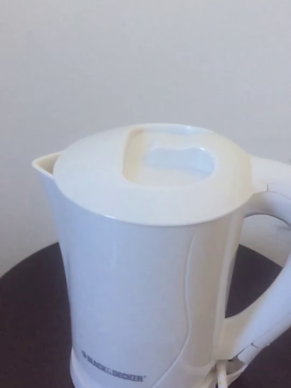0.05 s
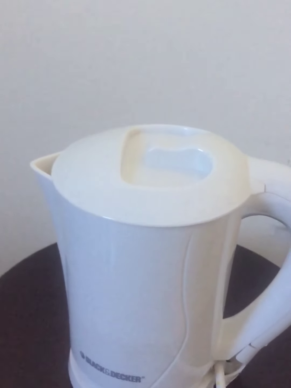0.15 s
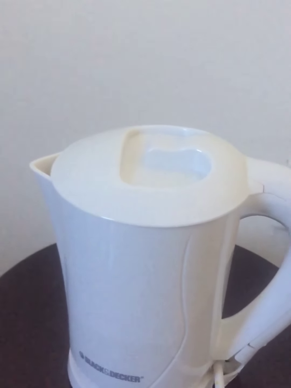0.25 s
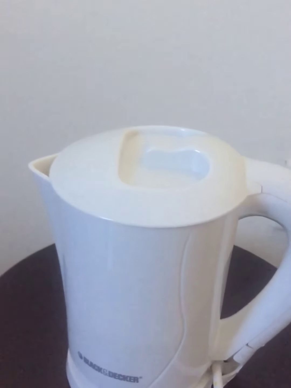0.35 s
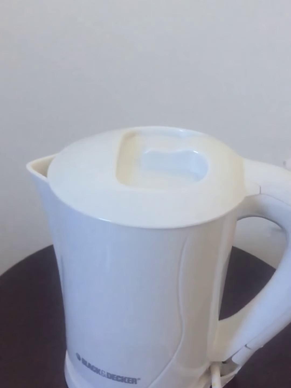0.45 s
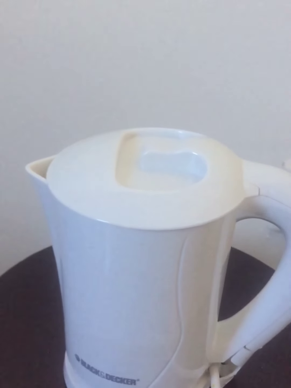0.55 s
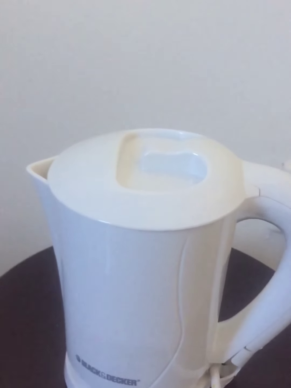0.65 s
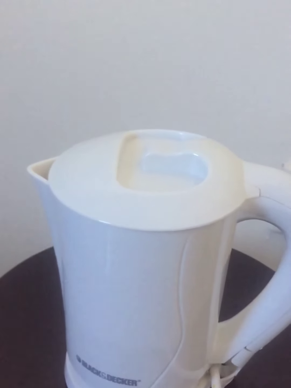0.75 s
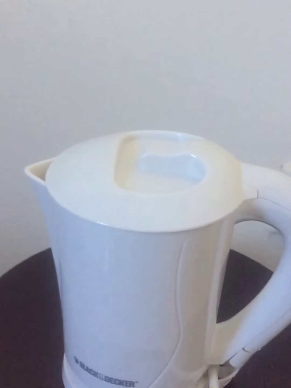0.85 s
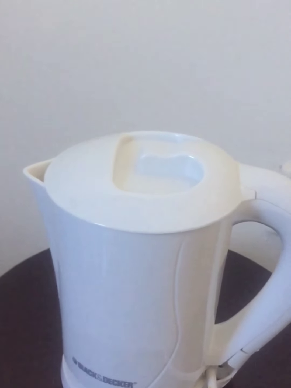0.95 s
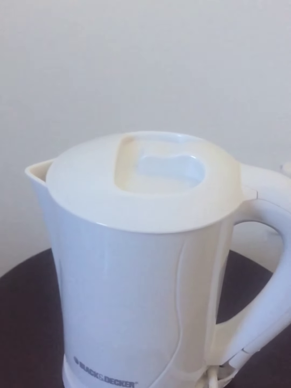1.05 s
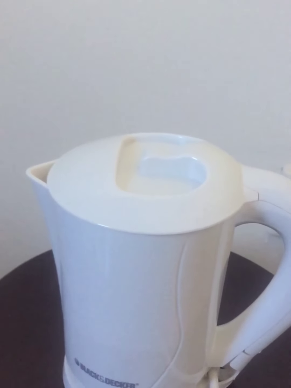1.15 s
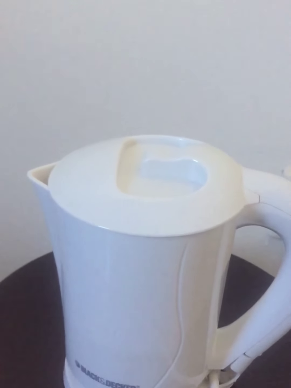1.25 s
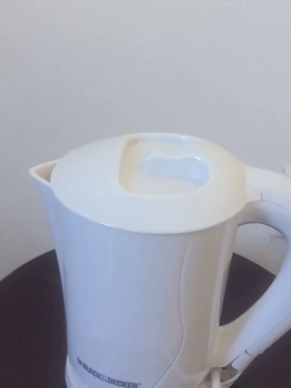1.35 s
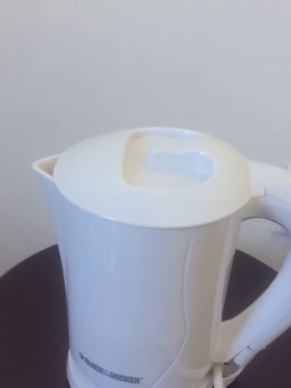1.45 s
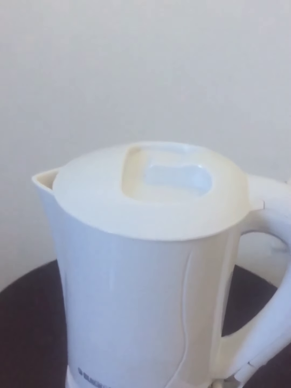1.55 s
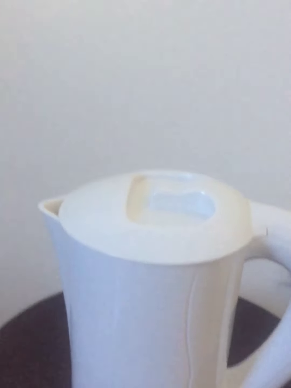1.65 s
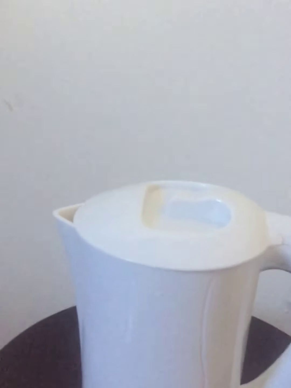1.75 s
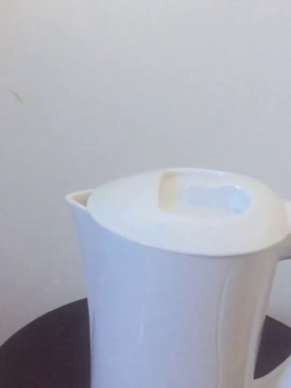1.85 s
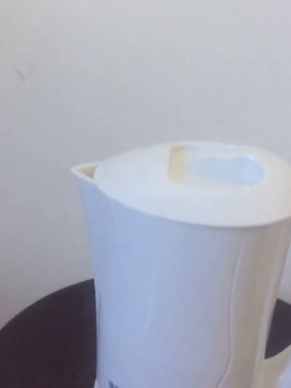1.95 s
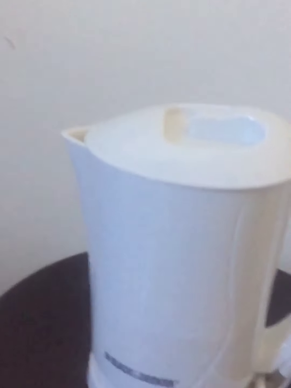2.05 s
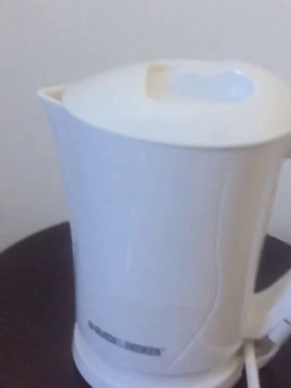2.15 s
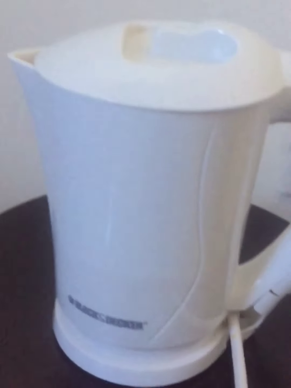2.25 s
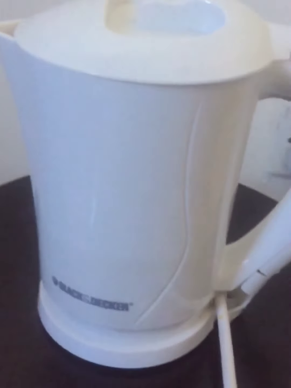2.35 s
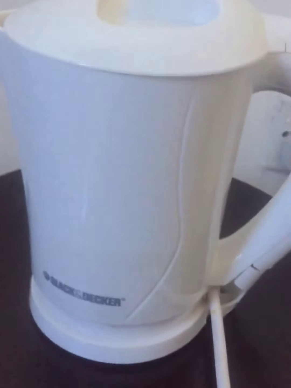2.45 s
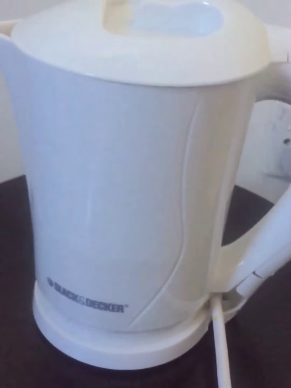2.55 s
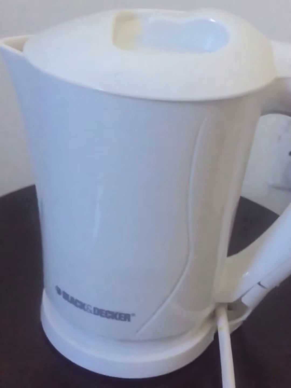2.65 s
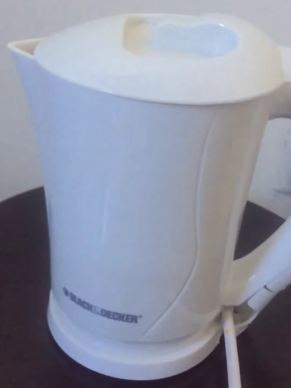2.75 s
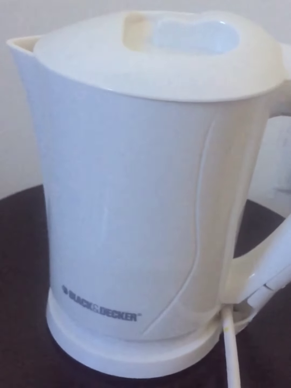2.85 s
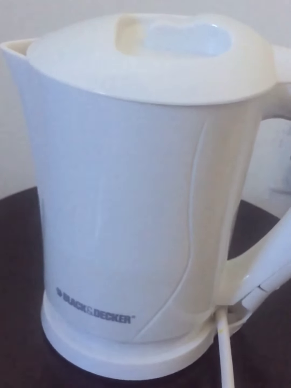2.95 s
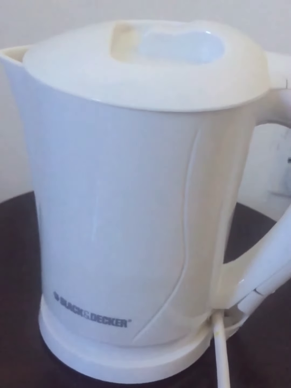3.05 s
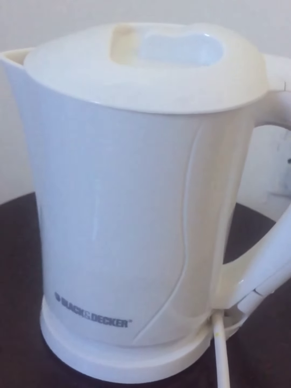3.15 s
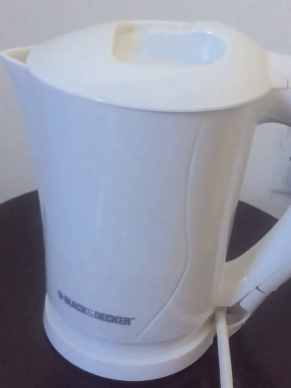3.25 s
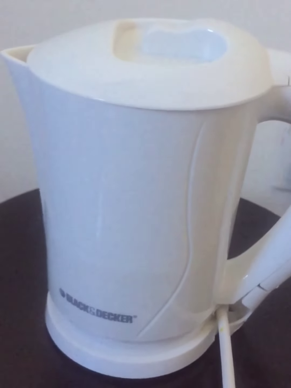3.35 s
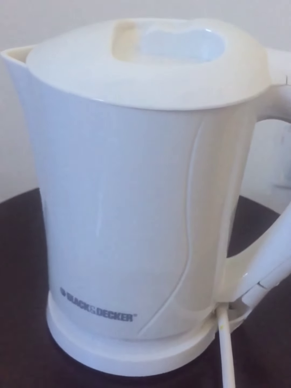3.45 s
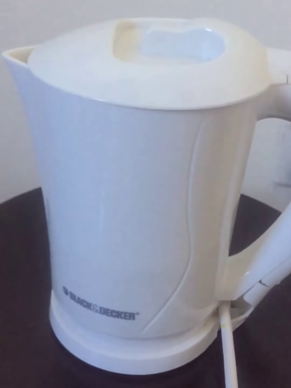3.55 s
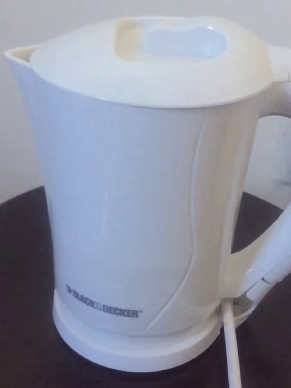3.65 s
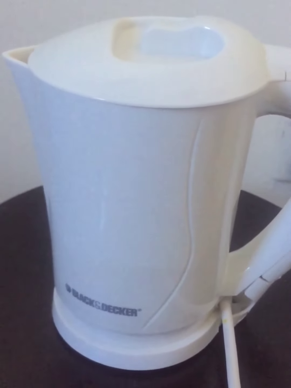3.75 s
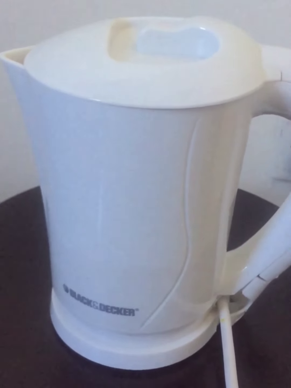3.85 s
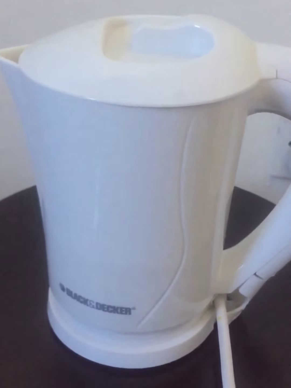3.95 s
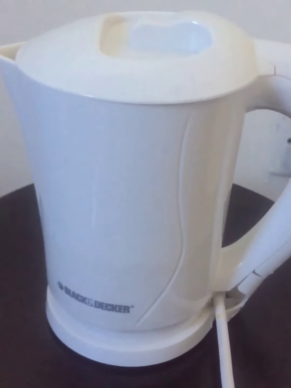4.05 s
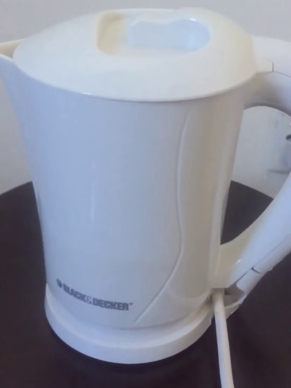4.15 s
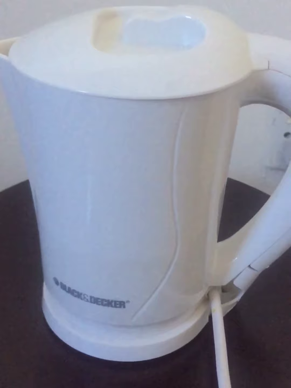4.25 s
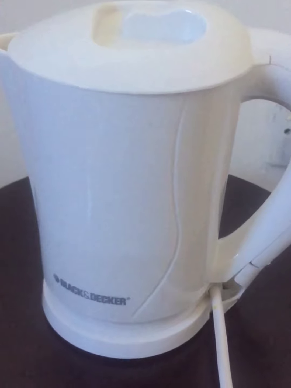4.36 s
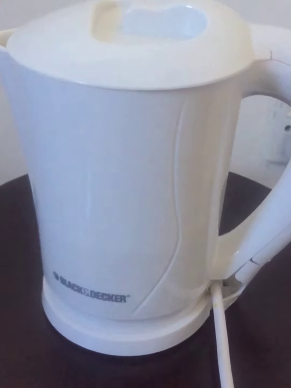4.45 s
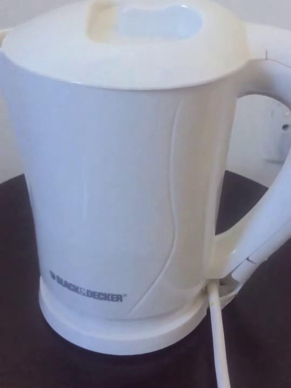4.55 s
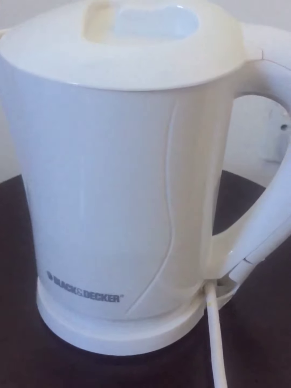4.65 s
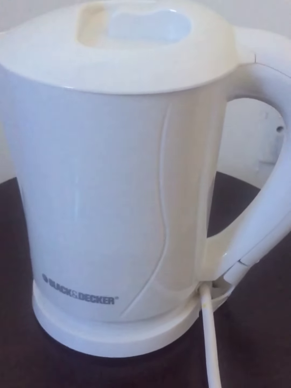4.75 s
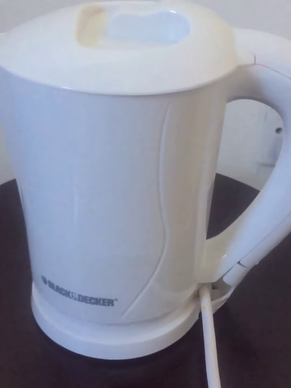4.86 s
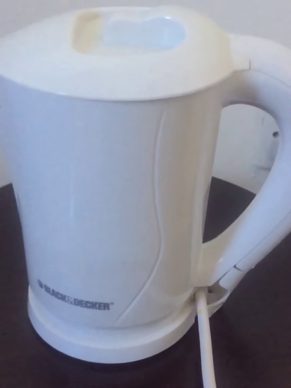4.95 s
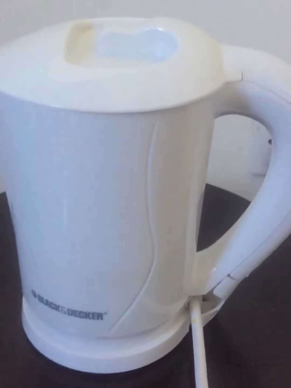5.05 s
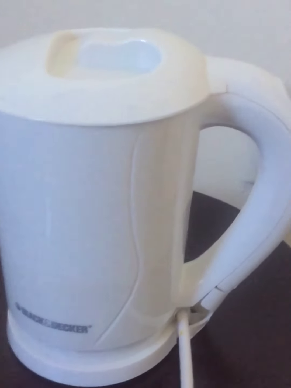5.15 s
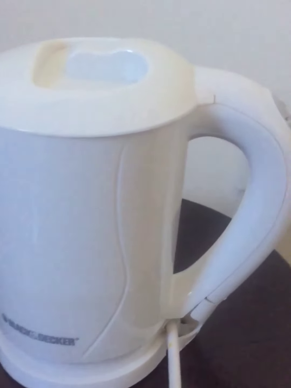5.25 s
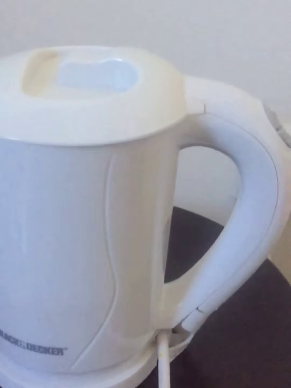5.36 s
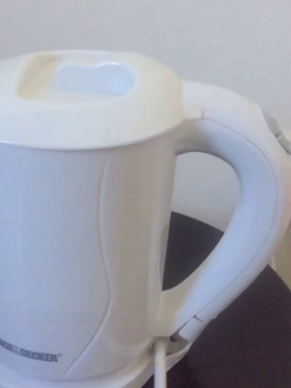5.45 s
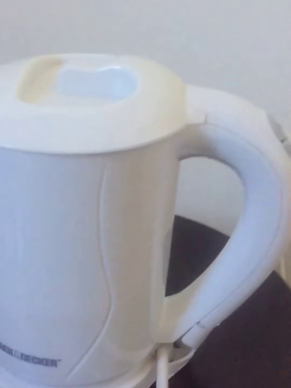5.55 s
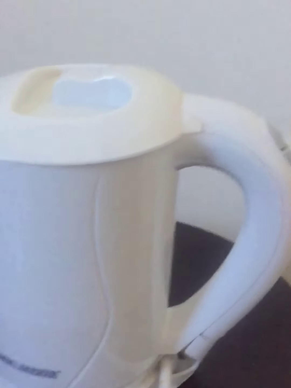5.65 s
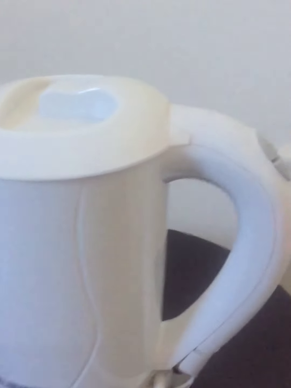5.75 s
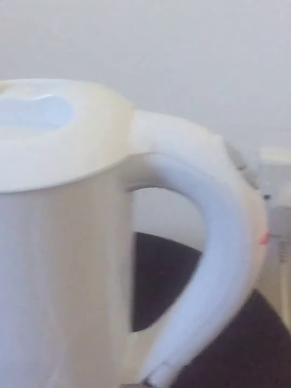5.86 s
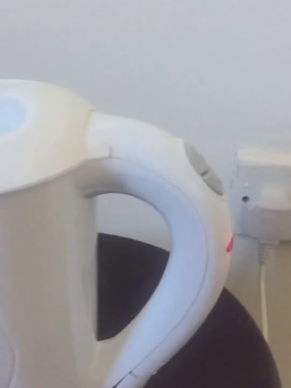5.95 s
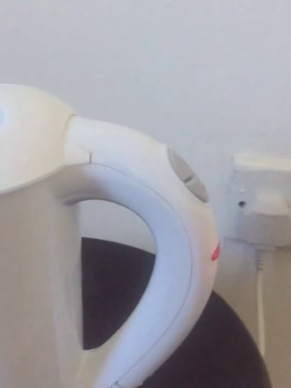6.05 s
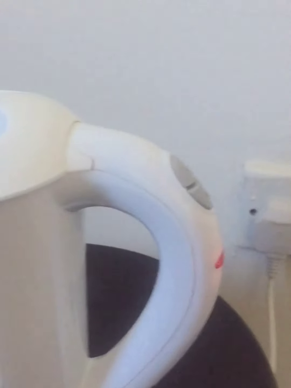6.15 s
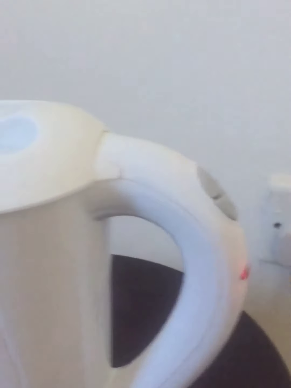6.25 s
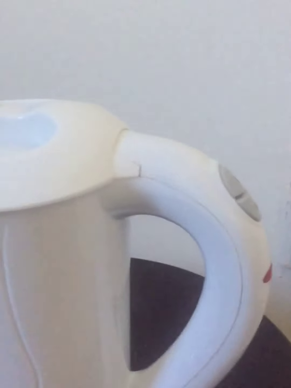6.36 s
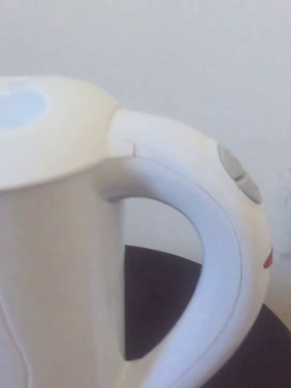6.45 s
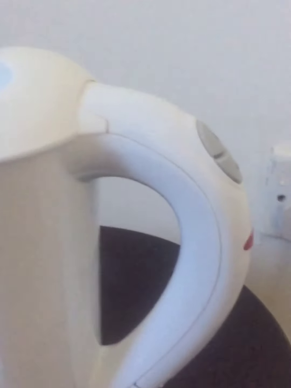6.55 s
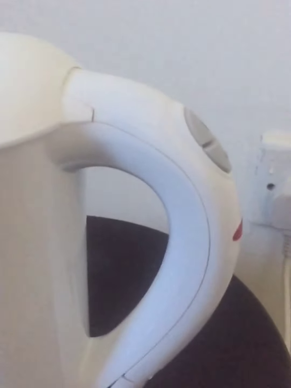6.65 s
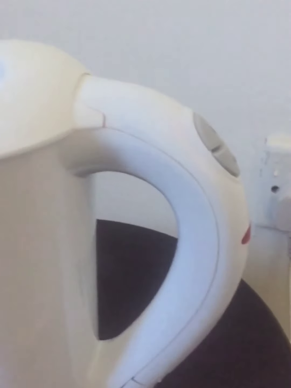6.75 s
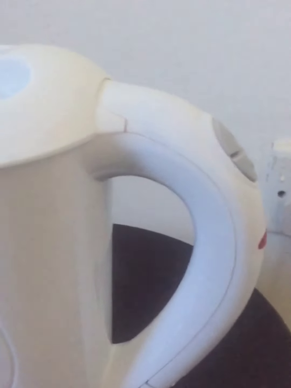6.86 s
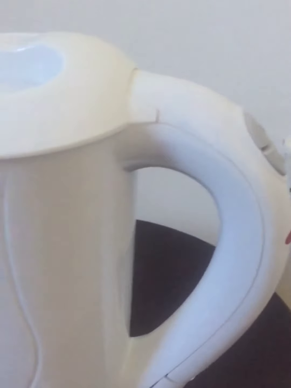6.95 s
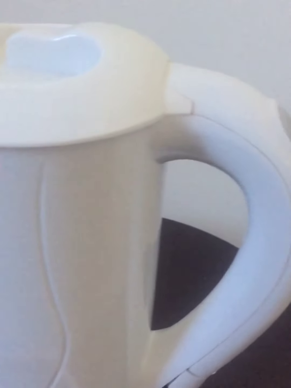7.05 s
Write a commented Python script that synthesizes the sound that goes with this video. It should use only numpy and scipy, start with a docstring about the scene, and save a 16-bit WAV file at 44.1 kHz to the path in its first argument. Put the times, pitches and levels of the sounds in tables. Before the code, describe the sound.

Continuous rapid bubbling rings inside a hollow plastic jug, close to the microphone in a small indoor space with short reflections. Small bubbles churn beneath larger rounded plops, and tiny drops spatter. Over a quiet wavering hum and slight hiss, a few thin ticks come late, followed by a single hard plastic switch snap, far louder than the water, which keeps boiling to the end.

```python
"""Water at a rolling boil in a plastic electric kettle, with one microphone close by in a small room. Big steam
bubbles are two-mode swings ringing the hollow jug; small bubbles and spray are clouds of tiny resonances, drops
are short noise bands. A few ticks sound as filtered noise bursts, most from the plastic, one a dry tap close
by; then the handle switch snaps off: ringing shell modes, a crack and chatter, while the water bubbles on.
Behind lie decaying room reflections, a faint motor hum of steady and fluttering tones, and coloured noise for
air and hiss."""
import sys
import numpy as np
from scipy import signal
from scipy.fft import rfft, irfft
from scipy.io import wavfile
from scipy.ndimage import uniform_filter1d

SR = 44100
rng = np.random.default_rng(int(sys.argv[2]) if len(sys.argv) > 2 else 0)


def master_out(mix):
    """Clip the mix to full scale and print it as 16-bit PCM to the path in sys.argv[1]."""
    frames = np.transpose(np.atleast_2d(mix))
    ceiling = np.clip(frames, -1, 1)
    pcm = np.round(ceiling * 32767).astype(np.int16)
    wavfile.write(sys.argv[1], SR, pcm)


N = 313551
TIME = np.arange(N) / SR
SHORT = TIME[:SR // 4]  # a quarter second for single events

# Big steam bubbles breaking the surface. Each row: start in seconds, peak level in dB, pitch in Hz,
# wetness in dB relative to the bubble (sets its burst and its surge of spray).
BIG_BUBBLES = [(0.01, -35, 397, -9), (0.184, -32.5, 346, -19), (0.273, -38, 464, -25),
               (0.358, -39.5, 656, -19), (0.389, -37.5, 606, -20), (0.408, -42, 410, -35),
               (0.444, -38.5, 442, -21), (0.557, -38, 428, -21), (0.572, -38.5, 580, -13),
               (0.596, -38, 426, -23), (0.634, -36, 426, -15.5), (0.655, -39, 370, -19),
               (0.741, -40, 590, -14), (0.761, -39.5, 430, -29), (0.804, -40.5, 575, -35),
               (0.854, -39, 580, -25), (0.88, -36, 454, -18), (0.912, -36, 358, -16.5),
               (1.007, -42, 440, -14), (1.031, -40.0, 420, -23), (1.221, -32, 450, -22),
               (1.409, -41, 410, -17), (1.432, -36.5, 480, -20), (1.52, -40.0, 334, -28),
               (1.553, -36.5, 334, -22), (1.579, -37.5, 440, -18), (1.639, -41, 447, -32),
               (1.655, -36, 360, -29), (1.709, -39, 430, -24), (1.828, -40, 510, -36),
               (1.975, -37.5, 615, -17), (2.029, -38, 290, -13), (2.168, -35.5, 425, -27),
               (2.238, -36, 446, -28), (2.253, -36.5, 453, -32), (2.29, -37, 380, -15),
               (2.315, -34.5, 304, -27), (2.341, -42, 474, -20), (2.362, -35, 420, -20),
               (2.445, -39.5, 483, -18), (2.526, -37, 436, -19), (2.592, -41, 400, -20),
               (2.614, -36.5, 564, -16), (2.631, -39.5, 318, -16), (2.651, -36.5, 308, -18),
               (2.676, -35.5, 306, -17), (2.714, -39, 388, -25), (2.766, -38.5, 576, -30),
               (2.832, -37, 476, -16), (2.874, -37, 457, -22), (2.933, -37.5, 454, -19),
               (2.955, -34.5, 580, -21), (2.968, -34, 370, -33), (2.983, -45, 583, -30),
               (3.055, -32, 498, -29), (3.077, -41, 410, -28), (3.104, -36.5, 357, -38),
               (3.137, -37, 624, -23), (3.25, -35, 345, -19), (3.316, -38, 390, -31),
               (3.363, -38.5, 546, -13), (3.383, -43, 404, -33), (3.449, -35, 377, -27),
               (3.482, -34.5, 530, -30), (3.494, -36.5, 422, -36), (3.524, -39.5, 454, -22),
               (3.588, -40, 450, -31), (3.615, -34.5, 413, -27), (3.632, -41, 410, -17),
               (3.647, -39, 390, -25), (3.716, -35, 580, -28), (3.741, -34.5, 374, -40),
               (3.772, -38, 448, -24), (3.918, -32.5, 570, -24), (3.947, -37, 520, -17),
               (3.999, -39, 490, -22), (4.041, -36, 417, -17.5), (4.135, -40.5, 420, -16),
               (4.166, -38.0, 494, -30), (4.181, -41, 420, -29), (4.216, -35.5, 473, -24),
               (4.24, -38.5, 444, -16), (4.256, -36.0, 406, -36), (4.293, -35, 407, -36),
               (4.379, -36, 466, -33), (4.395, -43.5, 413, -27), (4.476, -34, 416, -18.5),
               (4.523, -36, 366, -28), (4.614, -39.5, 410, -19.5), (4.692, -40.0, 366, -16),
               (4.714, -37, 384, -20.5), (4.847, -38, 570, -15), (4.87, -39.5, 412, -20),
               (4.89, -37.5, 412, -24), (4.92, -39, 350, -27), (4.957, -38.5, 547, -33),
               (4.98, -35, 437, -12.5), (5.129, -36.0, 420, -15), (5.262, -39.5, 426, -27),
               (5.382, -38.5, 380, -18), (5.413, -33.5, 330, -19.5), (5.432, -34, 317, -22),
               (5.46, -35, 520, -26), (5.598, -36.5, 340, -30), (5.647, -35.5, 464, -28),
               (5.661, -32, 493, -26), (5.681, -37.5, 570, -21), (5.723, -35.5, 376, -21),
               (5.789, -37, 487, -11.5), (5.829, -36, 420, -35), (5.86, -41.5, 390, -21),
               (5.95, -39, 615, -17.5), (5.98, -42.5, 465, -35), (6.027, -39, 428, -11),
               (6.044, -38.5, 410, -16), (6.096, -41.5, 460, -14), (6.114, -36, 500, -15.5),
               (6.249, -36.0, 485, -21), (6.394, -38, 400, -15), (6.549, -33.0, 447, -28),
               (6.581, -33.5, 400, -24), (6.625, -35.5, 350, -17.5), (6.644, -37.5, 443, -21),
               (6.68, -40.0, 397, -17), (6.704, -34, 468, -24), (6.722, -41, 630, -15),
               (6.842, -36.5, 420, -18), (6.861, -35, 414, -27), (6.914, -39, 534, -21),
               (6.994, -33, 436, -23), (7.027, -34, 450, -21)]
# Large pockets of steam deep in the jug. Each row: start in seconds, peak level in dB before a common lift,
# starting pitch in Hz.
DEEP_GULPS = [(0.129, -54, 147), (0.352, -47, 184), (0.9, -43, 175), (1.221, -37.5, 265), (2.027, -45, 253),
              (2.297, -46, 156), (2.4, -45.5, 150), (2.711, -45, 148), (4.708, -52, 188),
              (6.16, -48.5, 218), (6.679, -49, 204)]
# Resonances of the jug, its water and the air above. Each row: frequency in Hz,
# width in Hz (a twentieth of the frequency at least), gain in dB.
JUG_MODES = [(169.4, 18, -7), (231, 9.4, -10.5), (284.2, 28, -2), (327.7, 14, 2), (398.4, 54, -5),
             (440, 20, -15.5), (453, 320, -7.5), (538.5, 26, -4), (616, 52, -10.5), (767, 77, -11.5),
             (943, 114, -10.5)]
# Vigour of the boil, the reference for the water between big bubbles. Each row: time in seconds, level in dB.
BOIL_VIGOUR = [(0.0, -47.5), (0.53, -52.5), (0.9, -51), (1.2, -50.5), (1.9, -50.5), (2.35, -49),
               (2.8, -50.5), (3.05, -48.5), (3.3, -52), (3.62, -48.5), (3.85, -51), (4.18, -50),
               (4.67, -48), (5.31, -49), (5.7, -51), (6.0, -51.5), (6.36, -50), (6.66, -47), (7.11, -51)]
# Moments when the water rests. Each row: deepest point in seconds, half length in seconds.
BOIL_LULLS = [(0.075, 0.044), (0.321, 0.012), (0.793, 0.028), (1.053, 0.015), (1.294, 0.017),
              (1.475, 0.0065), (1.911, 0.0043), (2.206, 0.012), (2.911, 0.0077), (3.677, 0.017),
              (4.641, 0.047), (4.806, 0.014), (5.018, 0.018), (5.546, 0.029), (6.517, 0.025),
              (6.773, 0.058)]
# Colour of spray coming out through the spout. Each row: frequency in Hz, relative level in dB per Hz.
SPOUT_COLOUR = [(650, -24), (1100, -17.5), (1190, -0.5), (1410, -1), (1650, -11.5), (1810, -7.5),
                (2240, -5), (2640, -13), (3060, -7.5), (3860, -16), (4900, -17), (5300, -12.5), (7000, -13),
                (9100, -66), (15400, -120)]
# Drops thrown against the wall. Each row: start in seconds, peak level in dB, pitch in Hz.
WALL_DROPS = [(0.182, -56.5, 4430), (0.184, -54, 2550), (0.21, -54.5, 1430), (0.358, -56.0, 2880),
              (0.574, -55, 2430), (0.595, -51.5, 2160), (0.635, -59, 1940), (0.652, -53, 2190),
              (0.743, -61, 4400), (0.886, -54.5, 1480), (0.919, -67, 9000), (1.101, -54, 2200),
              (1.227, -56, 1870), (1.328, -53, 1560), (1.579, -53, 1660), (1.794, -59, 4000),
              (1.971, -62, 5400), (1.979, -52, 3100), (2.018, -55, 2090), (2.091, -54.5, 2700),
              (2.253, -57, 1500), (2.287, -56, 2400), (2.322, -60, 4600), (2.374, -55.5, 2300),
              (2.606, -50, 2200), (2.637, -54.5, 1800), (2.652, -58, 2620), (2.703, -53.5, 1960),
              (2.847, -49, 1720), (2.954, -59.5, 2370), (3.055, -56, 2150), (3.173, -59, 5000),
              (3.176, -47, 1700), (3.363, -47.5, 2270), (3.458, -54.5, 2300), (3.491, -57, 1650),
              (3.619, -53, 1780), (3.644, -54, 1930), (3.78, -56.5, 1640), (3.887, -55, 2080),
              (4.04, -58, 2220), (4.145, -50, 3070), (4.244, -48.5, 2030), (4.467, -60, 1650),
              (4.697, -61, 5950), (4.698, -58, 2200), (4.846, -53.5, 2560), (4.983, -50, 5600),
              (4.984, -48, 2800), (5.08, -54, 1600), (5.115, -56, 2200), (5.192, -52, 2200),
              (5.308, -59, 1500), (5.338, -50, 2300), (5.592, -51.5, 2050), (5.68, -54.0, 2400),
              (6.029, -55, 2220), (6.042, -56, 2070), (6.117, -60, 2150), (6.335, -56, 2730),
              (6.608, -53.5, 2360), (6.722, -59, 1900), (6.815, -52.5, 2840), (6.854, -56, 2050),
              (6.918, -57.5, 4650), (7.02, -50, 2010)]
# Ticks, most of them from the plastic, one (at 5.13 s) a dry tap close by. Each row: start in seconds, peak
# level in dB, decay t60 in seconds, lowest frequency in Hz, feed to the room in dB relative to the tick.
TICKS = [(4.521, -60, 0.079, 3980, -4), (4.862, -66, .05, 7000, -8), (5.1322, -47, 0.01, 6000, -20),
         (5.655, -54, 0.064, 4000, -8), (5.734, -60, .03, 4500, 2), (5.778, -51, .015, 4000, -13),
         (5.781, -42, 0.039, 3600, -6), (6.103, -63, 0.06, 5000, 2), (6.137, -65, 0.12, 5000, -2),
         (6.566, -47, 0.069, 4060, -6), (6.817, -56, 0.096, 2980, -7)]
# Bright crack of plastic on plastic. Each row: frequency in Hz, relative level in dB per Hz.
CRACK_COLOUR = [(2500, 17.5), (4500, -5), (6500, 1), (9000, 1), (10500, -2.5), (12800, -4), (14500, -1),
                (16000, -13.5)]
# The switch lets go, hits its stop and bounces. Each row: time in seconds, strength in dB.
SNAP_CONTACTS = [(6.436, -30), (6.4366, -0.5), (6.439, -26)]
# Modes of the handle and shell. Each row: frequency in Hz, level in dB, decay t60 in seconds.
SHELL_MODES = [(830, -19.5, 0.012), (950, -40, 0.016), (1140, -20.5, 0.019), (1594, -14, 0.016),
               (1760, -17, 0.018), (2040, -14, 0.011), (2490, -37, 0.0095), (3070, -18, 0.012),
               (3690, -29.5, 0.0092), (4260, -27, 0.013), (5500, -29, 0.0079), (6240, -33, 0.0088),
               (7660, -28.5, 0.017), (9040, -31, 0.016)]
# Where the shell's modes cancel: frequency in Hz, width in Hz.
SHELL_NULL = (1300, 80)
# Loose parts and the spring after the snap. Each row: frequency in Hz, width in Hz of each of two
# resonator passes, peak level in dB, decay t60 in seconds.
LOOSE_PARTS = [(1590, 450, -34, 0.31), (2080, 320, -39, 0.15), (3160, 530, -43, 0.18),
               (4180, 440, -40.5, 0.16), (7400, 6000, -48, 0.16), (12900, 900, -48, 0.12)]
# Returns of the snap from nearby walls. Each row: delay in seconds, level in dB.
WALL_ECHOES = [(0.0215, -23), (0.046, -26)]
# Decay of the room. Each row: frequency in Hz, t60 in seconds.
ROOM_DECAY = [(200, 0.077), (1500, 0.18), (4000, 0.26), (12000, 0.17)]
# Colour of the reflections. Each row: frequency in Hz, relative level in dB.
WALL_COLOUR = [(300, 5.5), (1500, -2), (4200, -4.5), (5500, -7.5), (10500, -2.5), (13000, 0.5), (15000, -7)]
# Low harmonics of the motor. Each row: frequency in Hz, rms level in dB, fluttering share of the power 0-1.
HUM_HARMONICS = [(48.8, -63, 0.5), (97, -65, 1), (146.7, -64.5, 0.67)]
# Swelling and fading of the hum's clearest line. Each row: time in seconds, rms level in dB.
HUM_LINE_SWELL = [(0.1, -76), (0.58, -52), (0.87, -67), (1.05, -56.5), (1.55, -59.5), (1.75, -72),
                  (2.1, -56), (2.42, -56), (2.7, -69), (3.25, -57.5), (3.62, -55.5), (4.1, -65.5),
                  (5.05, -56.5), (5.33, -68), (5.62, -54.5), (5.92, -55.5), (6.15, -63), (6.95, -55.5)]
# Still air of the room and microphone hiss. Each row: frequency in Hz, relative level in dB per Hz.
AIR_COLOUR = [(25, -27), (35, -31), (43, 6), (52, 5.5), (62, -1.5), (75, -2), (115, -9), (170, -4),
              (500, -29.5), (1200, -32.5), (3000, -34), (4900, -38.5), (6200, -38.5), (9000, -41.5),
              (10400, -44), (12000, -45), (16000, -48)]
# Narrow dips in the microphone's response. Each row: frequency in Hz, width in Hz, depth 0-1.
MICROPHONE_DIPS = [(4900, 300, 0.3), (7580, 1300, 0.29), (10460, 420, 0.6)]

# Each big bubble comes with a surge of small ones, which swells quickly and settles.
SURGE_LEAD_S, SURGE_ATTACK_S, SURGE_HOLD_S = 0.0024, 0.0023, 0.0087
CHURN_SETTLES_T60_S, SPRAY_SETTLES_T60_S = 0.041, 0.063
CHURN_SURGE_DB, SPRAY_SURGE_DB = -15, -12  # relative to the bubble, and to bubble plus wetness
CHURN_BASE_DB, SPRAY_BASE_DB = -2.5, -22  # between surges, relative to the vigour
GUSHES_PER_S, GUSH_DB = 24, 2  # chance swells of the small bubbles
LULL_DB = -7.5
HUM_LINE_HZ = 193.3
AIR_DB = -58.5  # rms
CUTOFF_HZ = 15750


def from_db(db):
    """Decibels to gain."""
    return 10 ** (np.asarray(db) / 20)


def rms_one(x):
    """Scale to unit rms."""
    return x / np.sqrt(np.mean(x ** 2) + 1e-20)


def peak_one(x):
    """Scale to unit peak."""
    return x / np.max(np.abs(x))


def at_hz(points, hz):
    """Read a curve on a log-frequency axis."""
    table_hz, values = np.transpose(points)
    return np.interp(np.log(hz + 1e-9), np.log(table_hz), values)


def coloured(x, spectrum):
    """Shape a sound with a spectrum in dB."""
    hz = np.fft.rfftfreq(len(x), 1 / SR)
    return irfft(rfft(x) * from_db(at_hz(spectrum, hz)), len(x))


def drift(swells_per_s):
    """Random wander of unit rms, with two knots per swell."""
    knots = rng.standard_normal(4096)
    return rms_one(np.interp(TIME * swells_per_s * 2, np.arange(len(knots)), knots))


def grit(grain_per_s, grain_db):
    """Uneven gain for a short event, wandering between random levels."""
    levels = rng.standard_normal(512)
    return from_db(grain_db * np.interp(SHORT * grain_per_s, np.arange(512), levels))


def passed(x, hz, kind, order=2):
    """Butterworth filter."""
    return signal.sosfilt(signal.butter(order, hz, kind, fs=SR, output="sos"), x + 1e-18)


def resonate(x, hz, width_hz):
    """One resonance with gain 1 on top."""
    r = np.exp(-np.pi * width_hz / SR)
    feed = np.array([1, 0, -1]) * (1 - r * r) / 2
    feedback = [1, -2 * r * np.cos(2 * np.pi * hz / SR), r * r]
    return signal.lfilter(feed, feedback, x + 1e-18)


def dying(t60):
    """A quarter second of exponential decay."""
    return from_db(-60 * SHORT / t60)


def add(track, s, sound):
    """Mix a sound into a track at a time in seconds."""
    start = max(round(s * SR), 0)
    track[start:start + len(sound)] += sound[:N - start]


def grains(per_s, spread_db):
    """Random clicks of uneven size and either sign."""
    sizes = from_db(spread_db * np.minimum(rng.exponential(1, N), 3))
    signs = rng.choice([-1, 1], N)
    return sizes * signs * (rng.random(N) < per_s / SR)


def evened(x, seconds):
    """Hold the slow level at 1 and keep the fine grain."""
    power = uniform_filter1d(x ** 2, max(int(seconds * SR), 2))
    return x / np.sqrt(np.abs(power) + 1e-12)


def jug(x):
    """The hollow jug rings with whatever the water does; its lid holds back the treble."""
    rung = sum(from_db(db) * resonate(x, hz, max(width_hz, hz / 20)) for hz, width_hz, db in JUG_MODES)
    return passed(passed(rung, 950, "low", order=4), 120, "high")


def big_bubbles(swell_s=0.002, t60=0.016, slap=0.36, overtone=0.24, overtone_ratio=1.417,
                burst_t60=0.035, burst_db=-5, burst_top_hz=4200, burst_attack_s=0.00053, burst_delay_s=0.001038):
    """A large bubble swings in two modes, rising in pitch as it surfaces, slaps the water and bursts."""
    out = np.zeros(N)
    for s, db, hz, wet_db in BIG_BUBBLES:
        phase = 2 * np.pi * hz * SHORT * (1 + 5 * SHORT)  # the squared time raises the pitch
        swing = np.sin(phase) + overtone * np.sin(overtone_ratio * phase)
        swing += slap * rms_one(passed(rng.standard_normal(len(SHORT)), [500, 1200], "band"))
        swing *= np.minimum(SHORT / swell_s, 1) * dying(t60)
        add(out, s, from_db(db) * peak_one(jug(swing)))
        burst = coloured(rng.standard_normal(len(SHORT)), SPOUT_COLOUR)
        burst = passed(burst, burst_top_hz, "low") * dying(burst_t60)
        burst *= np.minimum(SHORT / burst_attack_s, 1)
        add(out, s + burst_delay_s, from_db(db + wet_db + burst_db) * peak_one(burst))
    return out


def gulps(swell_s=0.0051, t60=0.06, lift_db=2):
    """A deep pocket of steam swells into a rounded low note, rises slightly and dies away."""
    out = np.zeros(N)
    for s, db, hz in DEEP_GULPS:
        note = np.sin(2 * np.pi * hz * SHORT * (1 + 0.65 * SHORT))
        note *= np.minimum(SHORT / swell_s, 1) * dying(t60)
        add(out, s, from_db(db + lift_db) * peak_one(note))
    return out


def surge(t60):
    """Attack, hold and release of the water stirred by one big bubble."""
    settling_s = np.maximum(SHORT - SURGE_ATTACK_S - SURGE_HOLD_S, 0)
    return np.minimum(SHORT / SURGE_ATTACK_S, 1) * from_db(-60 * settling_s / t60)


def agitation():
    """Levels in dB of churn and spray: a restless boil with lulls, plus a surge for each big bubble."""
    resting = sum(np.exp(-((TIME - s) / half_s) ** 4) for s, half_s in BOIL_LULLS)
    boil_db = np.interp(TIME, *np.transpose(BOIL_VIGOUR))
    boil_db = boil_db + GUSH_DB * drift(GUSHES_PER_S) + LULL_DB * resting
    # surges and boil add as powers
    churn_power = from_db(boil_db + CHURN_BASE_DB) ** 2
    spray_power = from_db(boil_db + SPRAY_BASE_DB) ** 2
    churn_surge, spray_surge = surge(CHURN_SETTLES_T60_S), surge(SPRAY_SETTLES_T60_S)
    for s, db, _, wet_db in BIG_BUBBLES:
        add(churn_power, s - SURGE_LEAD_S, (from_db(db + CHURN_SURGE_DB) * churn_surge) ** 2)
        add(spray_power, s - SURGE_LEAD_S, (from_db(db + wet_db + SPRAY_SURGE_DB) * spray_surge) ** 2)
    return 10 * np.log10(churn_power), 10 * np.log10(spray_power)


def churn(churn_db, per_s=380, spread_db=2.5, cycles=4.87, clump_db=1.0, tilt=0.73):
    """Many small bubbles ring for a few cycles at the surface; like sizes come in clumps."""
    pitches = np.geomspace(190, 1100, 14)
    flops = np.zeros(N)
    for hz in pitches:
        bubbles = grains(per_s / len(pitches), spread_db) * from_db(clump_db * drift(9))
        flops += resonate(bubbles, hz, hz / cycles) / hz ** tilt
    return from_db(churn_db) * evened(jug(flops), seconds=0.05)


def spray(spray_db, per_s=1000, spread_db=1.5, cycles=9, clump_db=3.5, top_hz=4200):
    """Films of water tear into tiny pitched bubbles, in clumps of like size."""
    pitches = np.geomspace(1150, 5000, 22)
    fizz = np.zeros(N)
    for hz in pitches:
        bubbles = grains(per_s / len(pitches), spread_db) * from_db(clump_db * drift(12))
        fizz += resonate(bubbles, hz, hz / cycles) / np.sqrt(hz)
    fizz = passed(coloured(fizz, SPOUT_COLOUR), top_hz, "low")
    return from_db(spray_db) * evened(fizz, seconds=0.13)


def drops(t60=0.027, spread=1.22):
    """Each drop spatters briefly in a noise band around a pitch of its own."""
    out = np.zeros(N)
    for s, db, hz in WALL_DROPS:
        spatter = rng.standard_normal(len(SHORT)) * dying(t60)
        spatter = passed(spatter, [hz / spread, hz * spread], "band")
        add(out, s, from_db(db) * peak_one(spatter))
    return out


def crack(t60):
    """A bright burst from a hard plastic contact."""
    return peak_one(coloured(rng.standard_normal(len(SHORT)), CRACK_COLOUR) * dying(t60))


def switch(crack_db=-16, crack_t60=0.02, lowest_hz=760, shell_top_hz=7000, rattle_db=-23, rattle_t60=0.027):
    """The sprung lever strikes the handle, the shell rings and its loose parts rattle briefly."""
    shell = np.zeros(len(SHORT))
    for k, (hz, db, t60) in enumerate(SHELL_MODES):
        sign = (-1) ** k  # neighbouring modes start in opposite directions
        shell += sign * from_db(db) * dying(t60) * np.sin(2 * np.pi * hz * SHORT)
    shell = passed(shell, shell_top_hz, "low")
    out = np.zeros(N)
    for s, db in SNAP_CONTACTS:
        add(out, s, from_db(db) * shell)
    add(out, SNAP_CONTACTS[0][0], from_db(crack_db) * crack(crack_t60))  # the contact itself
    rattle = passed(rng.standard_normal(len(SHORT)), [1300, 3200], "band") * dying(rattle_t60)
    add(out, SNAP_CONTACTS[-1][0], from_db(rattle_db) * peak_one(rattle))
    return passed(out - resonate(out, *SHELL_NULL), lowest_hz, "high", order=8)


def chatter(grain_per_s=350, grain_db=4):
    """Loose parts buzz unevenly in a few broad resonances and die away."""
    out = np.zeros(N)
    for hz, width_hz, db, t60 in LOOSE_PARTS:
        buzz = grit(grain_per_s, grain_db) * rng.standard_normal(len(SHORT)) * dying(t60)
        buzz = resonate(resonate(buzz, hz, width_hz), hz, width_hz)
        add(out, SNAP_CONTACTS[-1][0], from_db(db) * peak_one(buzz))
    return out


def ticks(grain_per_s=900, grain_db=4):
    """Light, gritty ticks, treble only, most from the plastic and one dry and close: the direct sound and what
    goes out into the room."""
    direct, to_room = np.zeros(N), np.zeros(N)
    for s, db, t60, low_hz, room_db in TICKS:
        tick = grit(grain_per_s, grain_db) * crack(t60)
        tick = from_db(db) * peak_one(passed(tick, low_hz, "high", order=4))
        add(direct, s, tick)
        add(to_room, s, from_db(room_db) * tick)
    return direct, to_room


def echoes(x, top_hz=4500):
    """Distinct, duller returns from nearby walls."""
    out = np.zeros(N)
    for delay_s, db in WALL_ECHOES:
        add(out, delay_s, from_db(db) * x)
    return passed(out, top_hz, "low")


def room(x, first_wall_s=0.0035):
    """Diffuse reflections arrive from the nearest wall on; each band dies at its own rate."""
    t = TIME[:SR // 2]
    edges = np.geomspace(100, 16000, 9)
    tail = np.zeros(len(t))
    for low_hz, high_hz in zip(edges, edges[1:]):
        t60 = at_hz(ROOM_DECAY, np.sqrt(low_hz * high_hz))
        tail += passed(rng.standard_normal(len(t)), [low_hz, high_hz], "band") * from_db(-60 * t / t60)
    tail = coloured(tail, WALL_COLOUR) * (t > first_wall_s)
    return signal.fftconvolve(x, tail / np.sqrt(np.sum(tail ** 2)))[:N]


def hum(pass_width_hz=8):
    """Low motor harmonics, part steady tone, part slow flutter; a clean line swells and fades above."""
    line_db = np.interp(TIME, *np.transpose(HUM_LINE_SWELL))
    out = np.sqrt(2) * from_db(line_db) * np.sin(2 * np.pi * HUM_LINE_HZ * TIME)
    for hz, db, share in HUM_HARMONICS:
        flutter = resonate(rng.standard_normal(N), hz, pass_width_hz)
        flutter = rms_one(resonate(flutter, hz, pass_width_hz))
        steady = np.sqrt(2) * np.sin(2 * np.pi * hz * TIME)
        out += from_db(db) * (np.sqrt(1 - share) * steady + np.sqrt(share) * flutter)
    return out


def still_air():
    """Noise with the colour of still room air and microphone hiss."""
    return from_db(AIR_DB) * rms_one(coloured(rng.standard_normal(N), AIR_COLOUR))


def scene(water_room_db=-11.5, switch_room_db=-12.5):
    """Kettle, room and background at one microphone."""
    churn_db, spray_db = agitation()
    water = churn(churn_db) + big_bubbles() + gulps() + spray(spray_db) + drops()
    snap = switch() + chatter()
    ticking, ticks_to_room = ticks()
    to_room = from_db(water_room_db) * water + from_db(switch_room_db) * snap + ticks_to_room
    reflections = room(to_room)
    air = still_air()
    mix = water + snap + echoes(snap) + ticking + reflections + hum() + air
    return mix[None]


def record(dry):
    """The microphone cuts a few narrow dips; the top is cut steeply."""
    for hz, width_hz, depth in MICROPHONE_DIPS:
        dry = dry - depth * resonate(dry, hz, width_hz)
    steep_top = signal.ellip(10, 0.1, 70, CUTOFF_HZ, fs=SR, output="sos")
    return signal.sosfilt(steep_top, dry)


dry = scene()
out = record(dry)
master_out(out)
```